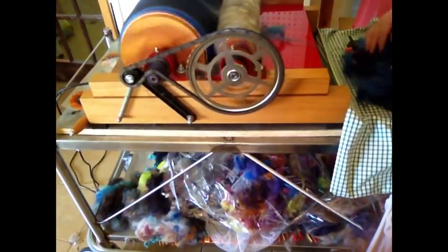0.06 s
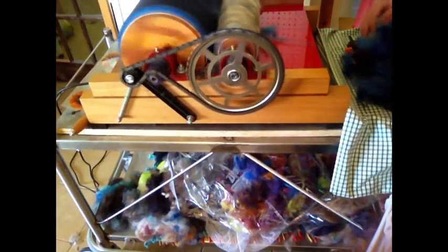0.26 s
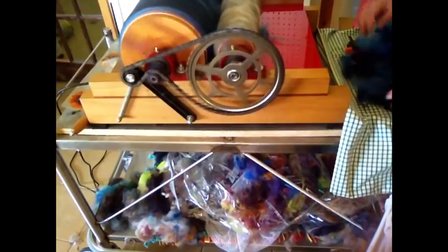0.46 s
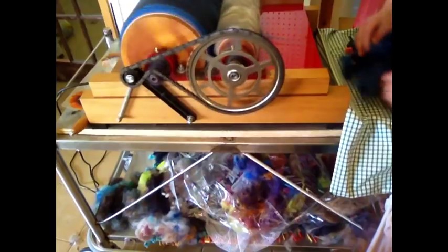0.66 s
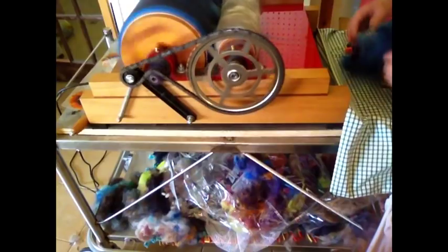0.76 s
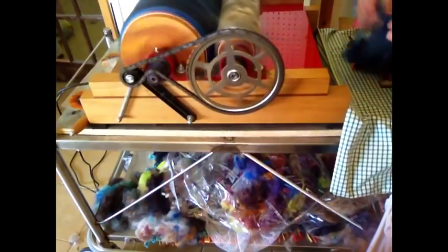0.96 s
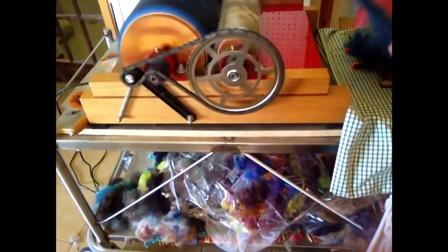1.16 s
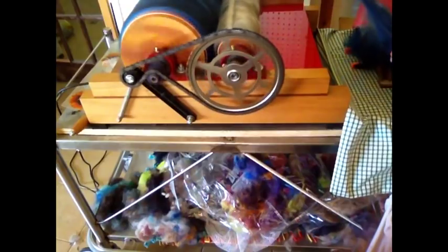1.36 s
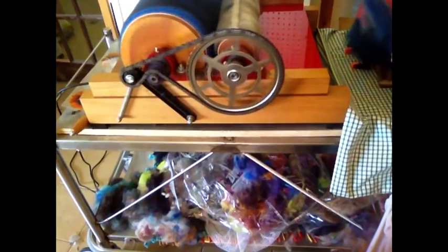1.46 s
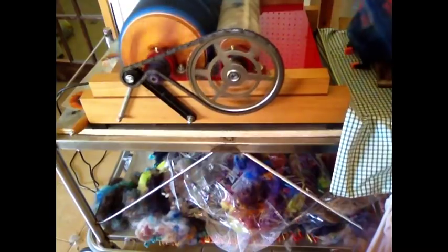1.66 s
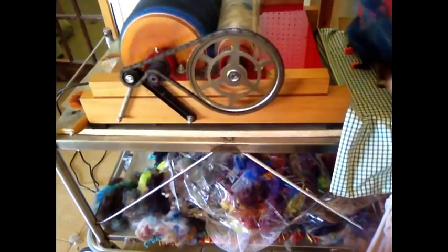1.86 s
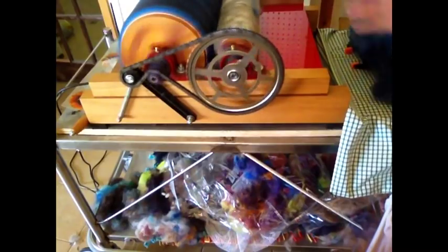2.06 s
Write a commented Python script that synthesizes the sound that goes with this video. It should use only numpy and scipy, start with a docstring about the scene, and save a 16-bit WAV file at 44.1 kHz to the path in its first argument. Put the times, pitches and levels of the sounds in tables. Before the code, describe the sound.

An electric drum carder runs in a small room with a low hum and fast, even ticking. Wire teeth rasp through wool in swells, the wooden frame thumps once, then the rasp thins amid light knocks and steel clicks.

```python
"""Electric drum carder in a small room

The motor hums, the wooden frame drones and the drive ticks evenly, with an occasional steel ping.
Wire teeth rasp through wool in swells that thin out as the tuft is drawn in.
The frame takes one firm thump and a few light knocks and clacks, and small steel parts click sharply."""
import sys
import numpy as np
from scipy import signal
from scipy.fft import rfft, irfft
from scipy.io import wavfile

SR = 44100
rng = np.random.default_rng(int(sys.argv[2]) if len(sys.argv) > 2 else 0)


def store_pcm(level_fs):
    """Save levels as 16-bit WAV."""
    pcm = np.round(np.clip(level_fs, -1, 1) * 32767).astype(np.int16)
    wavfile.write(sys.argv[1], SR, np.atleast_2d(pcm).T)


N = 92610
TIME = np.arange(N) / SR
HIT_TIME = TIME[:N // 6]  # time axis of a single hit


def amp(db):
    """Decibels to gain."""
    return 10 ** (np.asarray(db) / 20)


def unit(x):
    """Scales to rms 1."""
    return x / np.sqrt(np.mean(x ** 2) + 1e-20)


def read(points, hz):
    """Reads a table on a log-frequency axis."""
    f, value = np.transpose(points)
    return np.interp(np.log(hz + 1), np.log(f + 1), value)


def add(mix, start, sound):
    """Mixes a sound in at a start time in seconds."""
    part = mix[round(start * SR):][:len(sound)]
    part += sound[:len(part)]


def colour(x, spectrum):
    """Shapes a signal with an EQ curve, at rms 1."""
    hz = np.fft.rfftfreq(len(x), 1 / SR)
    return unit(irfft(rfft(x) * amp(read(spectrum, hz)), len(x)))


def wander(rate_hz):
    """A slow random curve of rms 1."""
    hz = np.fft.rfftfreq(N, 1 / SR)
    return unit(irfft(rfft(rng.standard_normal(N)) * (hz > 0) / (1 + (hz / rate_hz) ** 4), N))


def fade(t60):
    """A decay that falls 60 dB in t60 seconds."""
    return np.exp(-np.log(1000) * HIT_TIME / t60)


def attack(seconds):
    """A linear fade-in for a hit."""
    return np.minimum(HIT_TIME / seconds, 1)


def burst(spectrum, t60):
    """A blow on a part with many close, quickly dying modes."""
    return colour(rng.standard_normal(len(HIT_TIME)), spectrum) * fade(t60)


def ring(modes):
    """The dying modes of a struck part."""
    return sum(amp(db) * fade(t60) * np.sin(2 * np.pi * hz * HIT_TIME) for hz, db, t60 in modes)


# Magnetic hum. Each row: multiple of the mains frequency, relative level in dB.
HUM_HARMONICS = [(2, -72.5), (4, -51), (6, -72), (10, -55), (12, -89)]
# Rotor and gear tones. Each row: pitch in Hz, relative level in dB.
GEAR_TONES = [(172.2, -65), (201, -63.5), (206.5, -66), (258.4, -62), (268.6, -59), (287.2, -62.5),
              (315.8, -58.5), (353.5, -58), (388.8, -55.5)]

def motor(mains_hz=60):
    """The hum holds its pitch while the gear tones drift together; each tone wavers in level."""
    out = np.zeros(N)
    gear_time = np.cumsum(1 + 0.0056 * wander(rate_hz=6.7)) / SR
    for harmonic, db in HUM_HARMONICS:
        sway = 1 + 0.092 * wander(rate_hz=17)
        out += amp(db) * sway * np.sin(2 * np.pi * (harmonic * mains_hz * TIME + rng.random()))
    for hz, db in GEAR_TONES:
        sway = 1 + 0.22 * wander(rate_hz=0.83)
        out += amp(db) * sway * np.sin(2 * np.pi * (hz * gear_time + rng.random()))
    return np.sqrt(2) * out


# Low, woody drone. Each row: frequency in Hz, gain in dB.
DRONE_EQ = [(20, -54), (60, -15), (100, -49), (140, -1.5), (185, -11), (240, 7.5), (295, -6), (360, 7.5),
            (440, -2.5), (530, -4.5), (620, 3.5), (720, -27), (1000, -19.5), (1700, -31.5), (3000, -28),
            (6000, -29), (12000, -29.5), (15500, -39)]

def drone():
    """Bearings and drums shake the wooden frame."""
    flutter = amp(1.9 * wander(rate_hz=8.1))
    return amp(-50) * colour(rng.standard_normal(N) * flutter, DRONE_EQ)


# Resonances of the drum and housing. Each row: centre in Hz, width in Hz, boost or cut in dB.
DRUM_RESONANCES = [(800, 12, -13), (984, 14, 5.5), (1058, 35, 4), (1205, 49, 8), (1370, 30, 5.5),
                   (1354, 3.7, 12.5), (1540, 38, 7.5), (1804, 35, 7), (2698, 10.5, 9.5)]

def drum(x):
    """The drum and its housing colour a sound that passes through them."""
    hz = np.fft.rfftfreq(2 * N, 1 / SR)
    gain = 1 + sum((amp(db) - 1) / (1 + 2j * (hz - f) / width) for f, width, db in DRUM_RESONANCES)
    return irfft(rfft(x, 2 * N) * gain)[:N]


# Swells of wool against the teeth. Each row: time in seconds, rasp level in dB.
WOOL_SWELLS = [(0, -43.5), (.09, -45), (.2, -40), (.29, -46.5), (.37, -49.5), (.405, -43.5), (.465, -35.5),
               (.535, -38), (.61, -41), (.68, -44.5), (.735, -49), (.782, -38), (.815, -41), (.86, -42),
               (.945, -46), (.97, -41.5), (1.01, -43), (1.09, -46.5), (1.2, -49), (1.29, -50),
               (1.35, -46.5), (1.52, -47), (1.64, -49), (1.82, -48), (1.95, -55), (2.1, -54)]
# Short brushes of loose fibre. Each row: peak time in seconds, level in dB.
BRUSHES = [(.768, -54.5), (1.58, -60.5), (1.70, -62), (1.81, -59)]
# Body of the rasp, airy fibre hiss and thin tooth scratch. Each row: frequency in Hz, gain in dB.
RASP_EQ = [(20, -74), (200, -26), (450, -1), (750, -4), (1000, -2), (1250, -1.5), (1600, 0), (2200, -4.5),
           (3000, -14), (5000, -22), (15500, -24)]
HISS_EQ = [(20, -48), (1500, -30), (2800, 0.5), (4200, 6), (6000, 0.5), (10000, -0.5), (12500, -11),
           (15500, -28)]
SCRATCH_EQ = [(20, -50), (1500, 10), (2800, 5), (4200, 0), (7000, -2.5), (10000, -5), (15500, -27)]

def wool(snags_per_s=5000, scratches_per_s=260):
    """Tiny snags excite the drum; fibres hiss and single teeth scratch along with them."""
    level_db = np.interp(TIME, *np.transpose(WOOL_SWELLS)) + 0.5 * wander(rate_hz=30)
    drag = amp(level_db + 40)  # 1 when the rasp is at -40 dB
    rasp_snags, hiss_snags = rng.choice([-1, 1], (2, N)) * (rng.random((2, N)) < snags_per_s / SR)
    rasp = amp(level_db) * unit(drum(colour(rasp_snags, RASP_EQ)))
    brush = sum(amp(db) * np.exp(-((TIME - peak) / 0.027) ** 2) for peak, db in BRUSHES)
    hiss = np.hypot(amp(-55.5) * drag, brush) * colour(hiss_snags, HISS_EQ)
    tooth_db = 3.5 * np.minimum(rng.exponential(1, N), 2)
    teeth = amp(tooth_db) * (rng.random(N) < scratches_per_s / SR)
    scratch_envelope = signal.fftconvolve(teeth, fade(t60=0.024))[:N]
    scratch = colour(scratch_envelope * rng.standard_normal(N), SCRATCH_EQ)
    return rasp + hiss + amp(-65) * drag * scratch


# Ticks that ping on steel. Each row: start in seconds, level in dB.
PINGS = [(1.106, -42.5), (1.1581, -47.5), (1.2095, -44.5), (1.263, -53), (1.3153, -57), (1.3873, -51.5),
         (1.6828, -54), (1.7368, -49.5), (1.9458, -54)]
# Tone of a tick and of a ping. Each row: frequency in Hz, gain in dB.
TICK_EQ = [(20, -55), (300, -13), (900, 3), (1500, -7.5), (2400, 2.5), (2900, -34), (3600, -1), (4500, -37),
           (7000, -28), (15500, -26)]
PING_EQ = [(20, -55), (1500, -4.5), (2600, -8.5), (3050, -6), (3550, 0.5), (4300, -14), (7000, -18.5),
           (15500, -34)]

def drive(first_tick_s=0.0523, period_s=0.05263):
    """The drive ticks evenly and sometimes pings on steel, all heard through the drum."""
    out = np.zeros(N)
    for start in np.arange(first_tick_s, N / SR, period_s):
        add(out, start, amp(-45) * attack(0.0049) * burst(TICK_EQ, t60=0.055))
    for start, db in PINGS:
        add(out, start, amp(db) * burst(PING_EQ, t60=0.051))
    return drum(out)


# Dry midrange clack. Each row: frequency in Hz, gain in dB.
CLACK_EQ = [(20, -43), (300, -5), (900, 2.5), (1500, 1), (2200, -2.5), (3200, -12), (6000, -24),
            (15500, -67)]

def clack():
    """One loose part strikes and dies away quickly."""
    return burst(CLACK_EQ, t60=0.062)


# Sharp clicks. Each row: start in seconds, then levels in dB of the crack, high ring and clack.
CLICKS = [(0.0574, -47.5, -46, -47), (0.111, -56, -50, -56), (0.1185, -50.5, -63, -53),
          (.549, -42, -46, -43), (0.579, -41.5, -35, -44), (0.6006, -60, -53, -46), (0.608, -53, -64, -52),
          (.6135, -42.5, -62, -53), (0.642, -53, -65, -48), (0.9633, -47.5, -45, -46),
          (1.386, -44, -42.5, -58), (1.439, -60, -63, -61), (1.781, -61, -65, -64),
          (1.804, -56.5, -65, -54), (1.858, -53.5, -58, -64), (1.991, -57.5, -64, -60)]
# Bright, broad crack. Each row: frequency in Hz, gain in dB.
CRACK_EQ = [(20, -39), (400, -17), (1500, 4), (2800, -7), (4200, 6.5), (7000, 6), (10000, 3), (12300, -6),
            (13200, -9), (15500, -27)]

def clicks(ring_hz=12270, skirt_hz=1070):
    """Small steel parts snap: a crack, hardest in the first instant, with a high ring and a clack."""
    out, hz = np.zeros(N), np.linspace(20, SR / 2, 200)
    skirt = np.where(hz < ring_hz, skirt_hz, skirt_hz / 2)  # steeper above the peak
    ring_eq = np.c_[hz, -20 * np.log10(1 + ((hz - ring_hz) / skirt) ** 2)]
    snap = 1 + amp(-3) * fade(t60=0.008)
    for start, crack_db, ring_db, clack_db in CLICKS:
        crack = amp(crack_db) * burst(CRACK_EQ, t60=0.041) * snap
        high_ring = amp(ring_db) * burst(ring_eq, t60=0.049)
        add(out, start, crack + high_ring + amp(clack_db) * clack())
    return out


# Light knocks. Each row: start in seconds, level in dB.
KNOCKS = [(.119, -39.5), (0.314, -41), (0.555, -35), (1.2342, -33), (1.7597, -35), (1.9968, -36.5)]
# Their hollow ring. Each row: pitch in Hz, relative level in dB, t60 in seconds.
KNOCK_MODES = [(520, 0, 0.022), (760, -2, 0.026), (962, -1, 0.042), (1150, 3, 0.012), (1330, -9, 0.035),
               (1640, -8, 0.018)]

def knocks():
    """Loose parts knock on the frame: a hollow ring over a faint clack."""
    out = np.zeros(N)
    for start, db in KNOCKS:
        add(out, start, amp(db) * attack(0.0004) * (ring(KNOCK_MODES) + amp(-12) * clack()))
    return out


# Dry clacks. Each row: start in seconds, level in dB.
CLACKS = [(0.393, -37.5), (0.454, -43), (.553, -28), (.611, -34), (1.2825, -49), (1.2875, -38.5),
          (1.635, -46.5), (1.704, -40), (1.811, -50), (1.858, -42.5), (1.913, -43.5)]

def clacks():
    """Loose parts of the drive clack at uneven intervals."""
    out = np.zeros(N)
    for start, db in CLACKS:
        add(out, start, amp(db) * clack())
    return out


# Pitched scrapes. Each row: peak time in seconds, half length in seconds, level in dB, pitch in Hz.
CATCHES = [(0.462, 0.057, -41, 1215), (0.787, 0.011, -36, 1580), (1.003, 0.016, -44, 1490),
           (1.288, 0.0037, -42.5, 1520), (1.705, 0.0053, -42, 1510)]

def catches(width_hz=220):
    """The teeth catch a lock of wool and scrape briefly around one pitch."""
    out, hz = np.zeros(N), np.fft.rfftfreq(N, 1 / SR)
    for peak, half_length, db, pitch in CATCHES:
        band = 1 / (1 + ((hz - pitch) / (width_hz / 2)) ** 2)
        scrape = unit(irfft(rfft(rng.standard_normal(N)) * band, N))
        out += amp(db) * np.exp(-((TIME - peak) / half_length) ** 2) * scrape
    return out


# Thump and rebounds. Each row: start in seconds, level in dB, focus pitch in Hz, attack in seconds.
THUMPS = [(0.5504, -16, 357, 0.0048), (0.5698, -20, 368, .009), (.588, -23, 235, 0.0031),
          (.608, -27.5, 320, 0.0085)]
# Modes of the wooden frame. Each row: pitch in Hz, relative level in dB, t60 in seconds.
FRAME_MODES = [(146.3, -11.5, 0.24), (247.8, -11, 0.16), (366, 4, 0.045), (610, 0, 0.11), (873, 5.5, 0.092),
               (954, 7.5, 0.11), (1145, 4.5, 0.082), (1820, 18, 0.11)]
# Dull rush of its many weaker modes. Each row: frequency in Hz, gain in dB.
RUSH_EQ = [(20, -28), (150, -38), (210, -26), (270, 10), (360, -2.5), (500, -2), (1000, -16.5), (2000, -12),
           (5000, -24), (15500, -32)]

def thump(falloff_db_per_octave=15.5):
    """A firm blow and its softer rebounds ring the frame, driving modes near the focus pitch hardest."""
    out = np.zeros(N)
    for start, db, focus_hz, attack_s in THUMPS:
        modes = [(hz, mode_db - falloff_db_per_octave * abs(np.log2(hz / focus_hz)), t60)
                 for hz, mode_db, t60 in FRAME_MODES]
        rush = amp(-15.5) * burst(RUSH_EQ, t60=0.19)
        add(out, start, amp(db) * attack(attack_s) * (ring(modes) + rush))
    return out


# Reverb of the small room. Each row: frequency in Hz, t60 in seconds.
ROOM_DECAY = [(100, 0.67), (1000, 0.26), (5000, 0.31), (14000, 0.15)]

def room(x, predelay_s=0.004):
    """Sparse reflections, each band dying at its own speed."""
    length = SR // 2
    taps = rng.choice([-1., 1.], length) * (rng.random(length) < 0.1) * (TIME[:length] > predelay_s)
    hz, t, bands = signal.stft(taps, SR, nperseg=256)
    decay = np.exp(-np.log(1000) * t / read(ROOM_DECAY, hz)[:, None])
    tail = signal.istft(bands * decay, SR)[1]
    return signal.fftconvolve(x, tail / np.linalg.norm(tail))[:N]


# Hum and drone rise and fall as the load changes. Each row: time in seconds, gain in dB.
LOAD_GAIN = [(0, -4), (.15, 0), (.33, -3.5), (.5, 2), (.7, 1), (1.0, -0.5), (1.28, 2), (1.55, 0), (2.1, 1)]

def scene():
    """The running machine and the wool stay dry; only the hits feed the room. Mono."""
    running = amp(np.interp(TIME, *np.transpose(LOAD_GAIN))) * (motor() + drone())
    carding = wool() + catches()
    rattle = drive() + knocks() + clacks()
    snaps, thud = clicks(), thump()
    reverb = room(amp(-6) * rattle + amp(-3) * snaps + amp(-10.5) * thud)
    return (running + carding + rattle + snaps + thud + reverb)[None]


# Low self-noise of the microphone. Each row: frequency in Hz, gain in dB.
RUMBLE_EQ = [(20, -7), (80, 1), (150, -14), (15500, -62)]

def record(dry, low_cut_hz=103, high_cut_hz=15600):
    """A small microphone with little bass, a faint rumble of its own and a steep high cut."""
    thin = signal.sosfilt(signal.butter(4, low_cut_hz, "highpass", fs=SR, output="sos"), dry)
    rumble = amp(-86.5) * colour(rng.standard_normal(N), RUMBLE_EQ)
    high_cut = signal.firwin(511, high_cut_hz, window=("kaiser", 9), fs=SR)
    return signal.oaconvolve(thin + rumble, high_cut[None], "same")


dry = scene()
out = record(dry)
store_pcm(out)
```